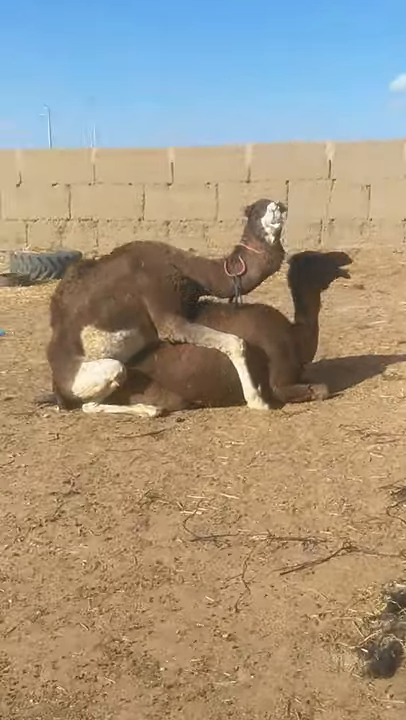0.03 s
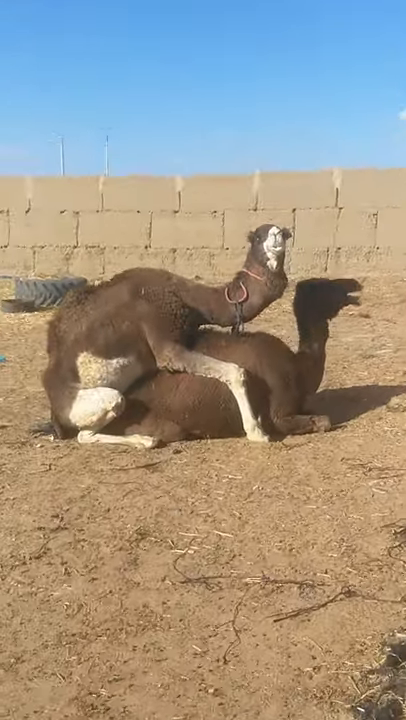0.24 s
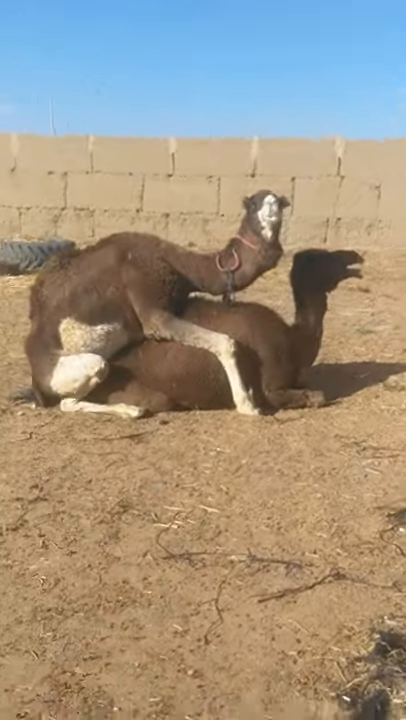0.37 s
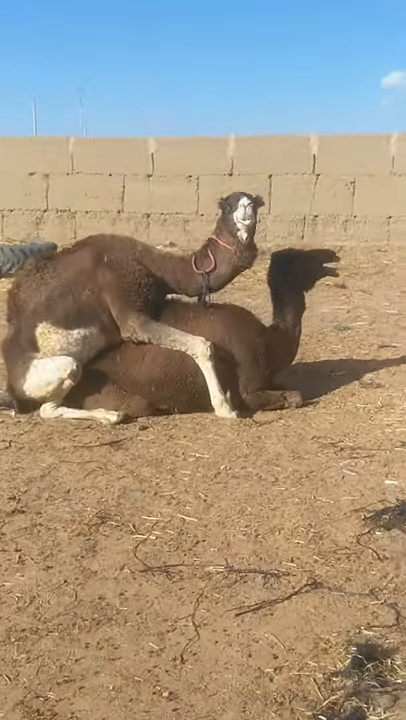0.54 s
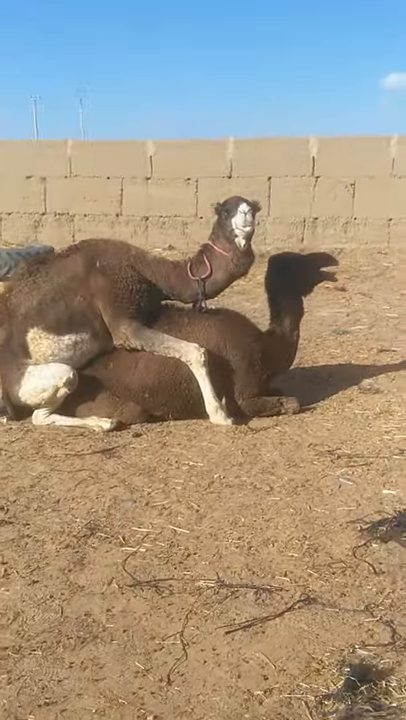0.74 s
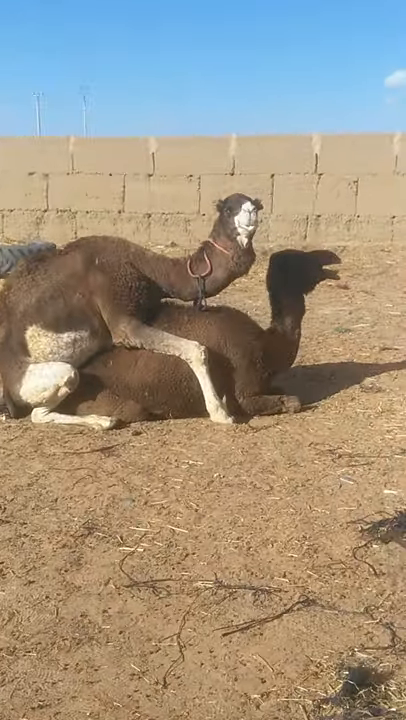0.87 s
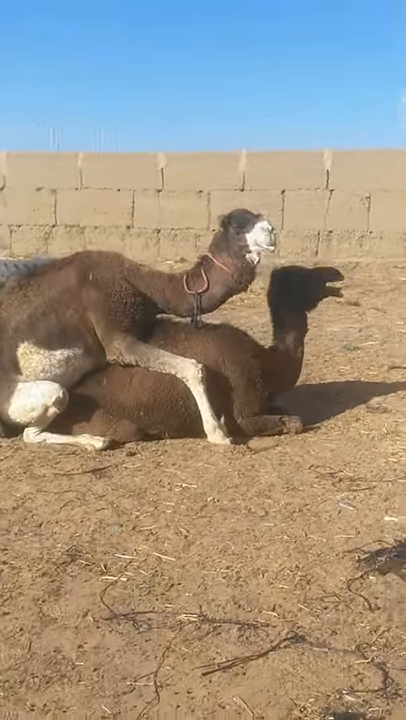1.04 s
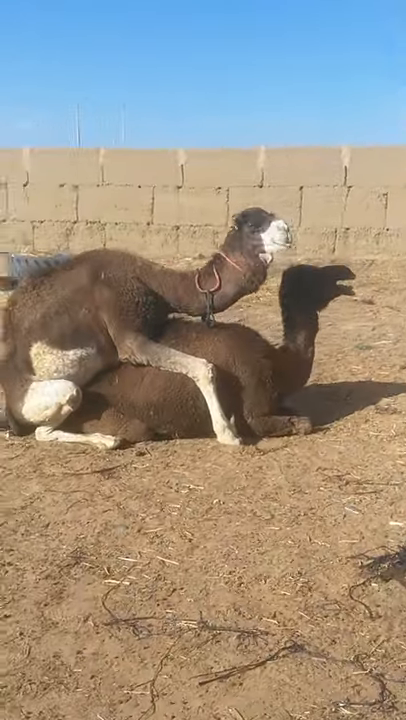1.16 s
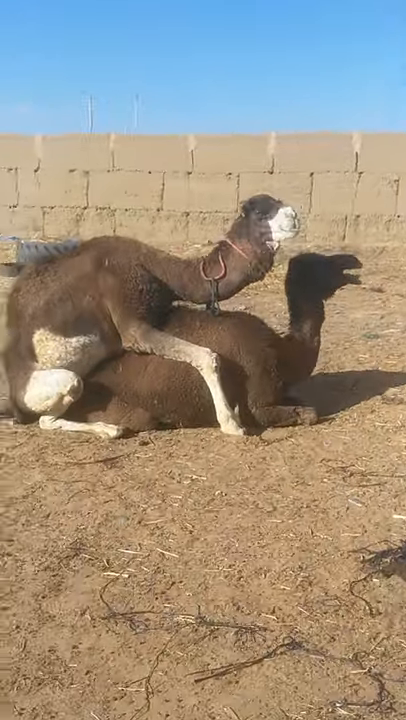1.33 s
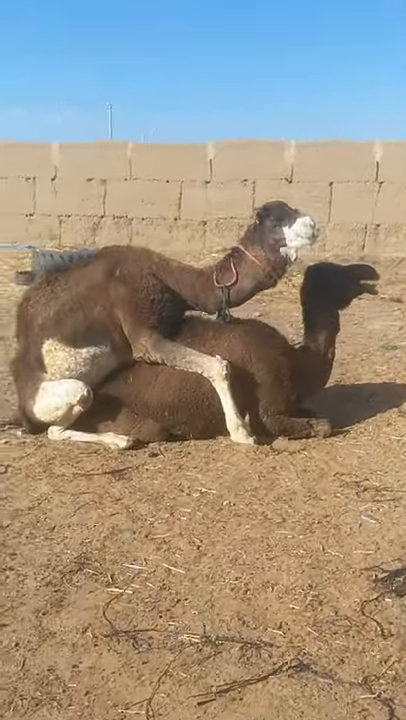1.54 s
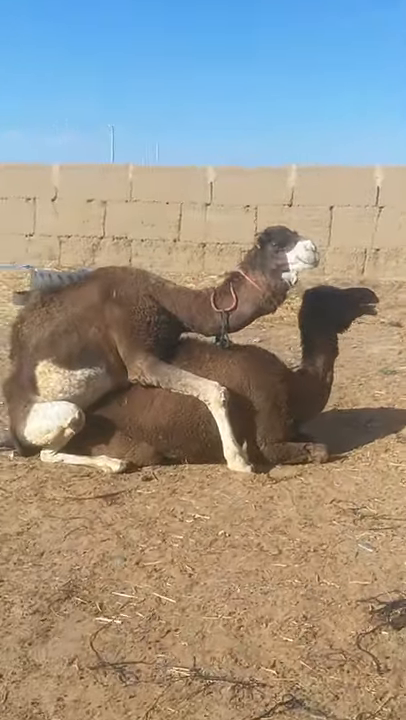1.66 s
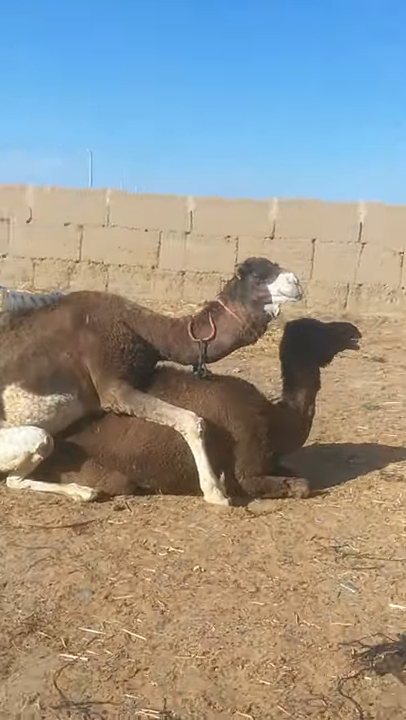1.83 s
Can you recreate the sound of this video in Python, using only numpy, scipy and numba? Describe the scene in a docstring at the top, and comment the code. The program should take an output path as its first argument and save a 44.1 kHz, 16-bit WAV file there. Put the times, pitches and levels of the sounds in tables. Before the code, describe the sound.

One loud, deep camel bellow wavers in pitch, rattles at full effort and trails off creaking. It is heard from a few metres away in an outdoor yard, with faint bird chirps and light straw rustling.

```python
"""A camel gives one long groaning bellow in a walled yard, a few metres away.
Slow pulses of its vocal folds ring the throat, whose resonances shift as the mouth opens, and a thin nasal
whistle rises with them; at full effort every second pulse weakens into a rattle, and the call ends in a
loose creak. Behind it small birds chirp, straw rustles and the ground is scuffed, over faint air."""
import sys
import numpy as np
from scipy import signal
from scipy.fft import rfft, irfft
from scipy.io import wavfile
from scipy.ndimage import uniform_filter1d
from numba import njit

SR = 44100
rng = np.random.default_rng(int(sys.argv[2]) if len(sys.argv) > 2 else 0)


def persist_wave(psi):
    """Save psi, clipped to +-1, as 16-bit WAV."""
    counts = np.round(np.clip(psi, -1, 1) * 32767).astype(np.int16)
    wavfile.write(sys.argv[1], SR, np.atleast_2d(counts).T)


N = 83790
TIME = np.arange(N) / SR


def undb(db):
    """Decibels to gain."""
    return 10 ** (np.asarray(db) / 20)


def curve(table, column=1):
    """An automation lane: one column of a table, joined by straight lines in time."""
    rows = np.array(table, float)
    return np.interp(TIME, rows[:, 0], rows[:, column])


def unit(x):
    """Scale to rms 1."""
    return x / np.sqrt(np.mean(x ** 2))


def steady(x, window=1300):
    """Ride the gain to a running rms of 1."""
    power = uniform_filter1d(uniform_filter1d(x ** 2, window), window)
    return x / np.sqrt(np.abs(power) + np.mean(power) * 1e-4)


@njit
def svf(x, tuning, damping):
    """State-variable band-pass with a moving centre."""
    out, band, low = np.empty(len(x)), 0., 0.
    for i in range(len(x)):
        g, k = tuning[i], damping[i]
        v = (band + g * (x[i] + 1e-18 - low)) / (1 + g * (g + k))
        band, low = 2 * v - band, low + 2 * g * v
        out[i] = k * v
    return out


def ring(x, hz, width_hz, order=1):
    """A resonance of gain 1; higher orders have steeper skirts."""
    hz = hz * np.ones(N)
    for _ in range(order):
        x = svf(x, np.tan(np.pi * hz / SR), width_hz / hz)
    return x


def edge(x, hz, kind, order=2):
    """Low-pass or high-pass."""
    return signal.sosfilt(signal.butter(order, hz, kind, fs=SR, output="sos"), x)


def wobble(depth, hz):
    """Random modulation around 1, moving at rates up to about hz."""
    return 1 + depth * unit(edge(rng.standard_normal(N), hz, "low"))


# EQ curve of the still air (frequency [Hz], relative level [dB])
AIR_EQ = [(20, -28.5), (50, -7), (110, -7.5), (300, -16), (800, -18), (1500, -13.5), (2300, -28),
          (4000, -22.5), (5200, -30.5), (6800, -40), (15000, -42)]

def air(level_db=-58):
    """A faint bed of outdoor rumble and hiss."""
    hz, db = np.array(AIR_EQ).T
    bins_hz = np.arange(N // 2 + 1) * SR / N
    colour = undb(np.interp(np.log(bins_hz + 1), np.log(hz), db))
    return undb(level_db) * unit(irfft(rfft(rng.standard_normal(N)) * colour, N))


# fader of the rustle (time [s], level [dB])
STRAW_LEVEL = [(0, -74), (.27, -72), (.31, -75), (.36, -66.5), (.45, -62.5), (.52, -65.5), (.6, -71.5),
               (.9, -74), (1.1, -68), (1.3, -72.5), (1.78, -84), (1.83, -70), (1.9, -76)]
# scuff cues (time [s], centre [Hz], decay [s], level [dB])
SCUFF_CUES = [(0.072, 854, 0.012, -47.5), (.3, 3650, 0.042, -52), (0.448, 5200, 0.0056, -55),
              (1.87, 670, 0.0072, -56)]

def ground():
    """Dry straw crackles in bright grains; each soft scuff is a dying burst of noise."""
    grains = rng.standard_normal(N) * undb(2.5 * rng.exponential(size=N))
    out = unit(edge(grains, 3520, "high")) * undb(curve(STRAW_LEVEL))
    for start, hz, decay, db in SCUFF_CUES:
        envelope = (TIME > start) * np.exp(-np.abs(TIME - start) / decay)
        out += undb(db) * envelope * unit(ring(rng.standard_normal(N), hz, width_hz=hz, order=2))
    return out


# fader of the flock (time [s], level [dB])
FLOCK_LEVEL = [(0, -60.5), (.3, -63), (.6, -72.5), (1.6, -78), (1.73, -85), (1.78, -106), (1.84, -63.5),
               (1.9, -61)]

def flock():
    """Distant birds blur into a high band of noise."""
    return undb(curve(FLOCK_LEVEL)) * unit(ring(rng.standard_normal(N), hz=4200, width_hz=1500, order=2))


# bird chirps, and at 0.549 s and 0.78 s the camel's nasal whistle
# (time [s], length [s], from [Hz], to [Hz], level [dB], waver [share of pitch])
GLIDE_CUES = [(-.02, 0.071, 3030, 2580, -58, .024), (-.015, .04, 5150, 4400, -63.5, .03),
              (0.087, 0.03, 3900, 4020, -60.5, .03), (.172, 0.047, 5180, 4350, -62.5, .024),
              (0.194, .075, 3720, 3900, -70, .024), (0.22, 0.038, 5860, 4930, -58, .024),
              (0.346, 0.17, 3150, 3300, -53.5, .024), (0.549, 0.22, 4590, 4700, -61, .015),
              (.78, .3, 4800, 4950, -59, .018), (1.738, 0.089, 3370, 2554, -65.5, .024),
              (1.765, 0.045, 4950, 4750, -66, .04), (1.79, 0.09, 5200, 5350, -65, .06)]

def chirps_and_nasal_whistle():
    """Wavering glides: small birds chirp, and the camel's nose resonance rises as its mouth opens."""
    out = np.zeros(N)
    for start, length, from_hz, to_hz, db, waver in GLIDE_CUES:
        along = np.clip((TIME - start) / length, 0, 1)
        pitch = (from_hz + (to_hz - from_hz) * along) * wobble(waver, hz=280)
        swell = 2 * undb(db) * np.sin(np.pi * along)
        out += swell * np.sin(2 * np.pi * np.cumsum(pitch) / SR)
    return out


def rebound(x, lag_s=.0016, share=.24):
    """An all-pass splits each pulse into a short burst of bounces without changing its colour."""
    taps = np.zeros(int(lag_s * SR) + 1)
    taps[0], taps[-1] = 1, share
    return signal.lfilter(taps[::-1], taps, x)


# pitch line of the folds (time [s], pulse rate [Hz])
FOLD_PITCH = [(.148, 85.22), (.194, 90.34), (.294, 109.6), (.338, 130.9), (.36, 135.7), (.424, 141.2),
              (.496, 154.9), (.524, 156), (.586, 137.6), (.626, 108.2), (.666, 102.5), (.718, 101.6),
              (.78, 104.9), (.848, 110.8), (.956, 133.9), (.99, 138.1), (1.042, 142.2), (1.188, 135.8),
              (1.252, 119.5), (1.292, 114.1), (1.335, 114), (1.41, 118.5), (1.478, 107.6), (1.6, 97.94),
              (1.66, 70.68), (1.8, 63.9)]
# grit in the voice (time [s], jitter [ms], loss of every second pulse [0-1], breath share [0-1])
FOLD_GRIT = [(.15, .15, 0, .3), (.27, .2, .1, .3), (.32, .4, .1, .45), (.36, .03, 0, .14),
             (.52, .03, 0, .16), (.58, .35, .25, .35), (.63, .2, .1, .25), (.67, .025, 0, .12),
             (.8, .025, 0, .13), (.89, .05, .05, .22), (.99, .025, 0, .13), (1.05, .025, .1, .13),
             (1.07, .05, .65, .18), (1.2, .05, .58, .2), (1.25, .05, .05, .2), (1.3, .015, 0, .1),
             (1.56, .025, 0, .13), (1.63, .5, .1, .5), (1.8, .6, .2, .5)]
# the voice catches for a pulse or two (time [s], half-length [s], loss [0-1])
VOICE_CATCHES = [(1.102, .005, .7), (1.144, .007, .85)]

def folds(start_s=.145, end_s=1.82, puff_db=-21):
    """The vocal folds give one uneven pulse a cycle, each followed by a puff of air."""
    cycles = np.cumsum(curve(FOLD_PITCH) * (TIME > start_s)) / SR
    count = int(np.interp(end_s, TIME, cycles))
    onsets = np.searchsorted(cycles, np.arange(count), side="right")
    jitter_ms, loss, breath = (curve(FOLD_GRIT, column) for column in (1, 2, 3))
    size = 1 - loss[onsets] * (np.arange(count) % 2)
    for when, half, depth in VOICE_CATCHES:
        size *= 1 - depth * (np.abs(onsets / SR - when) < half)
    place = np.clip(onsets + rng.standard_normal(count) * jitter_ms[onsets] * SR / 1000, 0, N - 2)
    sample, fraction = place.astype(int), place % 1
    pulses = np.zeros(N)
    pulses[sample] += size * (1 - fraction)
    pulses[sample + 1] += size * fraction
    puff_decay = .25 + breath  # in cycles: a breathier voice has longer puffs
    puffs = np.interp(np.arange(N), onsets, size, left=0, right=0) * np.exp(-(cycles % 1) / puff_decay)
    noise = rng.standard_normal(N)
    hiss = noise + undb(8) * edge(noise, 3000, "high", order=1)  # the air hisses more in the treble
    return pulses * (1 - breath) + undb(puff_db) * breath * puffs * hiss


# fader of the fundamental (time [s], level [dB])
CHEST_LEVEL = [(0.145, -59), (0.18, -46.5), (0.24, -56), (0.3, -62), (0.34, -59), (0.48, -50), (0.53, -61),
               (0.57, -51), (0.65, -72.5), (0.84, -64.5), (0.97, -47.5), (1.1, -48), (1.23, -50),
               (1.29, -65), (1.43, -58.5), (1.48, -66), (1.6, -59.5), (1.68, -52.5), (1.74, -52),
               (1.82, -75)]

def chest(source):
    """A fixed low resonance puts weight on the fundamental."""
    return steady(ring(source, hz=137.2, width_hz=37, order=4)) * undb(curve(CHEST_LEVEL))


# the mouth's movement, narrow to wide (time [s], opening [0-1])
MOUTH_OPENING = [(.15,.07),(.3,0.07),(.42,0.38),(.5,0.39),(.6,0.48),(.72,0.56),(.86,0.97),(1.02,1),(1.15,0.98),(1.25,0.97),(1.33,0.79),(1.43,0.99),(1.52,0.5),(1.62,0.5),(1.75,.63)]

def mouth_modes(source, table, order=1):
    """One resonance a row, morphing in tuning and gain as the mouth opens."""
    opening = curve(MOUTH_OPENING)
    modes = []
    for narrow_hz, wide_hz, width_hz, narrow_db, wide_db in table:
        hz = (narrow_hz + (wide_hz - narrow_hz) * opening) * wobble(.007, hz=14)  # soft tissue trembles
        gain = undb(narrow_db + (wide_db - narrow_db) * opening)
        modes.append(gain * ring(source, hz, width_hz, order))
    return modes


# mouth and nose resonances (narrow [Hz], wide [Hz], bandwidth [Hz], narrow trim [dB], wide trim [dB])
RASP_MODES = [(3450, 3520, 240, -5.5, -3), (3730, 3800, 230, -2, 1.5), (4250, 4050, 130, -3, -7),
              (4600, 4650, 170, -7.5, -4), (4740, 4890, 170, -12.5, -4), (5260, 5750, 250, -16.5, -22.5)]
# fader of the rasp (time [s], level [dB])
RASP_LEVEL = [(.145, -82), (.3, -61), (.44, -55.5), (.54, -56), (.63, -63), (.75, -53), (.96, -46.5),
              (1.15, -49), (1.32, -52), (1.42, -48.5), (1.54, -54.5), (1.6, -64.5), (1.7, -82), (1.82, -68)]

def nose(source):
    """Air and the top end of the pulses rasp in mouth and nose."""
    drive = steady(edge(source, 3000, "high")) + undb(-3) * rng.standard_normal(N)
    rasp = sum(mouth_modes(drive, RASP_MODES, order=2))
    return steady(rasp) * undb(curve(RASP_LEVEL))


# lowest pharynx resonance (narrow [Hz], wide [Hz], bandwidth [Hz], narrow trim [dB], wide trim [dB])
PHARYNX_MODE = [(216.2, 207.3, 18.4, -8, -3)]
# sweep of the main deep resonance (time [s], centre [Hz])
BOOM_SWEEP = [(.15, 272), (.42, 278), (.52, 293), (.59, 273), (.63, 334), (.72, 308), (.87, 334),
              (.93, 303.5), (1.0, 314.5), (1.2, 283), (1.26, 340.3), (1.4, 347), (1.55, 333), (1.66, 266)]
# fader of both together (time [s], level [dB])
BOOM_LEVEL = [(0.145, -55), (0.19, -43), (0.25, -31.5), (0.29, -36), (0.32, -41), (0.36, -31.5),
              (0.42, -23.5), (0.49, -32.5), (0.55, -33.5), (0.58, -34), (0.68, -36), (0.8, -37.5),
              (0.87, -33), (1.02, -37.5), (1.08, -35.5), (1.22, -38), (1.27, -33.5), (1.38, -34),
              (1.5, -37.5), (1.57, -39.5), (1.63, -45), (1.72, -52.5), (1.82, -75)]

def pharynx(source):
    """Two deep resonances give the groan its boom."""
    boom = sum(mouth_modes(source, PHARYNX_MODE)) + ring(source, curve(BOOM_SWEEP), width_hz=46)
    boom = edge(boom, 205, "high", order=6)
    boom = edge(boom, 364, "low", order=5)
    return steady(boom) * undb(curve(BOOM_LEVEL))


# throat resonances: two beside the "aw", two middle, four upper
# (narrow [Hz], wide [Hz], bandwidth [Hz], narrow trim [dB], wide trim [dB])
THROAT_MODES = [(650, 782, 111, -24.5, -3), (1142, 994, 19, -15, -15), (1150, 1531, 108, -2, -7),
                (1562, 1414, 42, -5, 4), (1742, 1772, 83, 1, -4.5), (1780, 1836, 61, 1, 0.5),
                (2494, 2470, 74, -7, -3), (2642, 2616, 106, -10.5, -8)]
# sweep of the strong "aw" resonance (time [s], centre [Hz])
VOWEL_SWEEP = [(0.15, 717), (0.3, 710), (0.39, 709.5), (0.46, 706), (0.55, 812.0), (0.7, 793), (0.82, 868),
               (0.92, 821.5), (1.05, 832.3), (1.24, 846), (1.32, 784), (1.42, 799), (1.51, 833.8),
               (1.6, 821), (1.8, 777)]
# faders of the three groups (time [s], "aw" level [dB], middle level [dB], upper level [dB])
THROAT_LEVELS = [(0.145, -50, -60, -57), (0.2, -36.5, -43.5, -40), (0.31, -34, -41, -36),
                 (0.37, -30.5, -42, -31), (0.425, -26, -40.5, -28.5), (0.48, -26.5, -37.5, -32),
                 (0.53, -28.5, -37.3, -32.5), (0.62, -30.5, -40, -38), (0.72, -31.1, -34.5, -34.5),
                 (0.76, -30.2, -39, -33.5), (0.82, -27, -32.5, -33.5), (0.95, -29.5, -30, -30.5),
                 (1.04, -25.5, -28.5, -34.6), (1.12, -26.5, -32, -31), (1.145, -30, -30.5, -34.7),
                 (1.18, -27.5, -28, -33), (1.22, -30.5, -31, -32), (1.26, -25.5, -30.7, -34.5),
                 (1.32, -26, -31.5, -33.5), (1.41, -28.7, -29.5, -32.0), (1.46, -28.5, -35, -35.5),
                 (1.525, -26, -37, -35), (1.58, -32.5, -42, -42), (1.63, -43, -47.5, -49.9),
                 (1.67, -47, -47, -55), (1.72, -48.2, -47, -63), (1.755, -47, -53.5, -67),
                 (1.82, -60, -69, -63)]

def throat(source):
    """The pulses ring three groups of moving resonances: the open "aw" of the bellow."""
    modes = mouth_modes(source, THROAT_MODES)
    # as in a tube, neighbouring groups swing in opposite directions: each pulse echoes within its cycle
    vowel = ring(source, curve(VOWEL_SWEEP), width_hz=32) + modes[0] + modes[1]
    middle = -modes[2] - modes[3]
    upper = modes[4] + modes[5] - modes[6] - modes[7]
    out = np.zeros(N)
    for column, group in enumerate((vowel, middle, upper), start=1):
        group = edge(group, 2720, "low", order=12)
        group = edge(group, 406, "high", order=6)
        out += steady(group) * undb(curve(THROAT_LEVELS, column))
    return out


def camel():
    """One train of fold pulses drives four layers of the bellow."""
    source = rebound(folds())
    return throat(source) + nose(source) + pharynx(source) + chest(source)


def scene(yard_t60_s=.16, predelay_s=.002, wet_db=-13.5):
    """Camel and birds with a short scatter from the walls, over dry ground and air."""
    calls = camel() + flock() + chirps_and_nasal_whistle()
    tail = rng.standard_normal(N) * (TIME > predelay_s) * np.exp(-np.log(1000) * TIME / yard_t60_s)
    walls = signal.fftconvolve(calls, tail / np.linalg.norm(tail))[:N]
    return (calls + undb(wet_db) * walls + ground() + air())[None]


def record(dry, top_hz=15800):
    """A steep low-pass takes the very top off the mix."""
    return signal.sosfilt(signal.ellip(10, .2, 80, top_hz, fs=SR, output="sos"), dry)


dry = scene()
out = record(dry)
persist_wave(out)
```